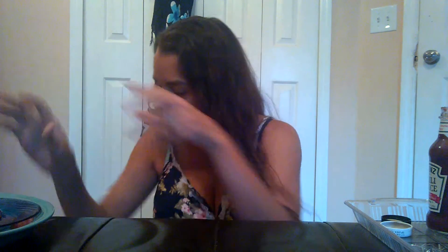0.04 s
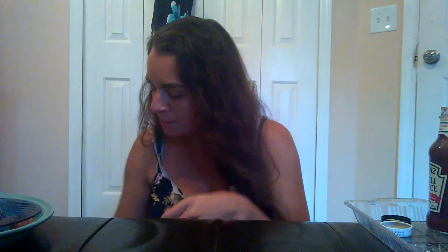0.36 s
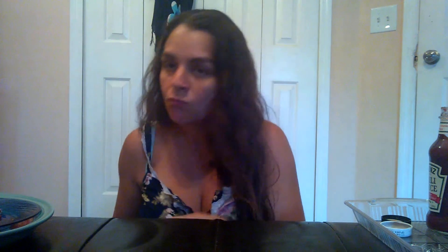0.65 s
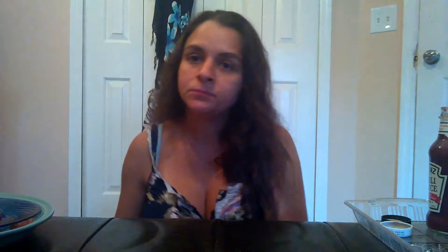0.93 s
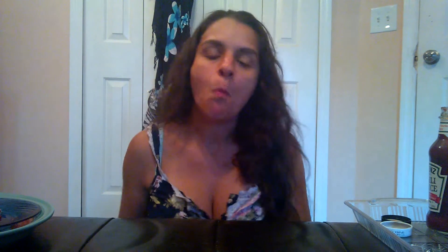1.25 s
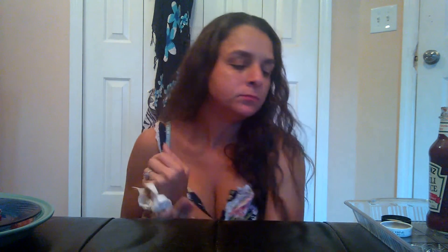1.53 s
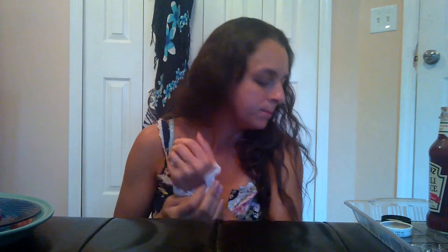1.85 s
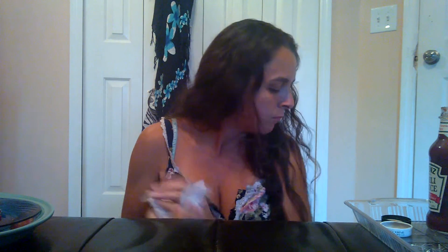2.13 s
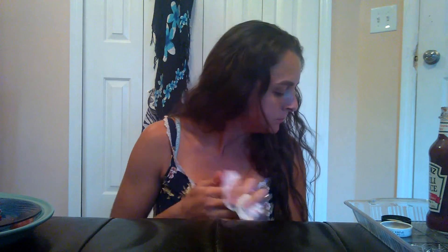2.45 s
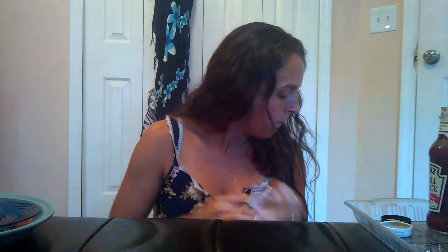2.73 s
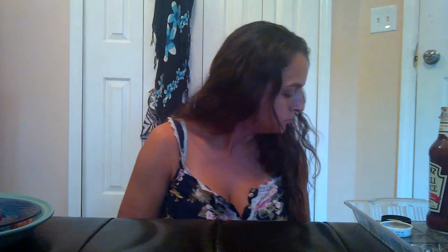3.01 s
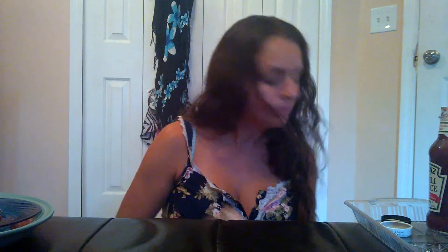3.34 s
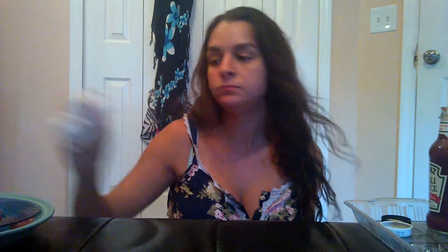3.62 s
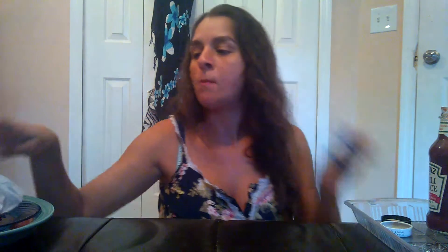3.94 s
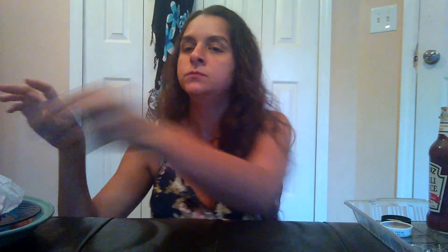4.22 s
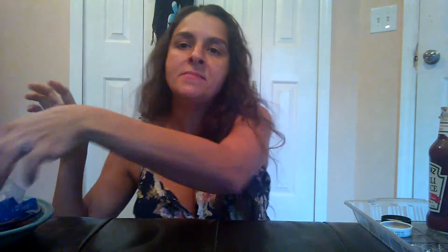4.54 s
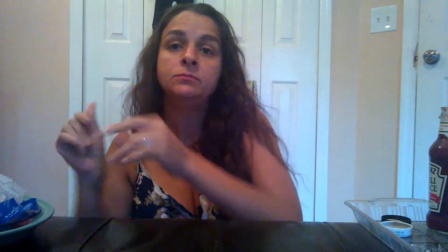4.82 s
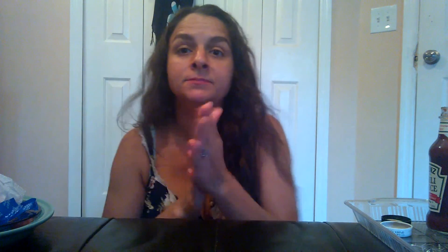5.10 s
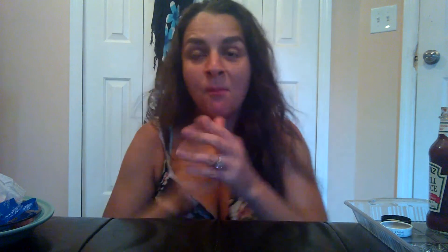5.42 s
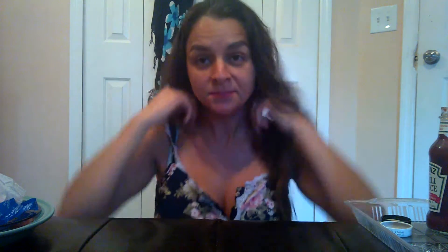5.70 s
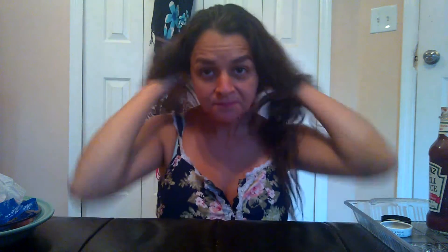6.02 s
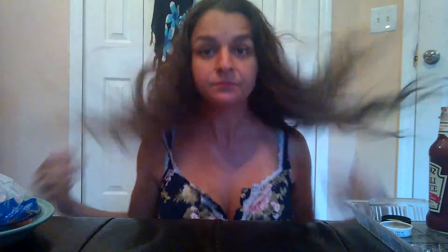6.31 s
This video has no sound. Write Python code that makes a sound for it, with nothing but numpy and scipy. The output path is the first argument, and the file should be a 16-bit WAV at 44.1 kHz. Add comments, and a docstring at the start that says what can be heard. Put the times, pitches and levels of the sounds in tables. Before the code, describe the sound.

Hands rub on a paper napkin, crumple it and drop it on crinkling wrappers, then brush against each other in a small, humming room.

```python
"""A soft paper napkin rustles as hands are wiped on it, at a table in a small room: fibres catch and slip.
Its creases buckle and snap as it is crumpled and put down on a plate of stiff wrappers.
Then bare palms brush together and hair is swept back. Arms thud on the table, an appliance hums.
A laptop's two microphone ports pick it up, and its stereo widening hollows the sound."""
import sys
import numpy as np
from scipy import signal
from scipy.fft import rfft, irfft
from scipy.io import wavfile

SR = 44100
rng = np.random.default_rng(int(sys.argv[2]) if len(sys.argv) > 2 else 0)


def store_pcm(level_fs):
    """Save levels as 16-bit WAV."""
    pcm = np.round(np.clip(level_fs, -1, 1) * 32767).astype(np.int16)
    wavfile.write(sys.argv[1], SR, np.atleast_2d(pcm).T)


N = 284886
TIME = np.arange(N) / SR
BINS = np.maximum(np.fft.rfftfreq(N, 1 / SR), 1)

# hands wipe on the napkin: fastest_s, length_s, hiss_db, rub_db
WIPES = [(.01, 0.065, -60, -61.5), (.125, 0.15, -57.5, -59), (.52, 0.069, -54, -48), (.7, 1, -64, -60.5),
         (1.085, 0.096, -53, -52.5), (1.21, 0.22, -51.5, -50.5), (1.46, 0.51, -58, -55),
         (1.57, 0.18, -50.5, -49.5), (1.73, 0.13, -45.5, -51), (1.87, 0.25, -50.5, -53),
         (1.98, 0.16, -45, -51), (2.2, 0.21, -42, -48.5), (2.38, 0.29, -45, -47.5),
         (2.55, 0.16, -45.5, -54.5), (2.78, 0.29, -51.5, -54), (2.9, 0.11, -44, -49.5),
         (3.0, 0.26, -51, -54), (3.19, 0.17, -49.5, -53.5), (3.35, 0.12, -58, -62)]
# the napkin rustles as it is lifted and put down: fastest_s, length_s, hiss_db, rub_db
SETTLES = [(3.51, 0.21, -27.5, -56), (3.75, 0.44, -44.5, -57), (3.9, 0.23, -34, -50.5),
           (4.11, 0.098, -37, -52.5), (4.22, 0.55, -47, -58.5), (4.42, 0.33, -35.5, -71),
           (4.8, 1, -47, -70)]
# tone colour of rubbed paper: frequency_hz, gain_db
NAPKIN_COLOUR = [(150, -10.5), (300, -12.5), (600, -18), (1200, -21), (2000, -18.5), (3500, -15),
                 (6000, -15.5), (8500, -12.5), (11500, -8.5), (14000, -14), (15400, -18.5)]
# the napkin buckles in bursts: start_s, rise_s, hold_s, fall_s, level_db
CRUMPLES = [(3.41, 0.001, 0.012, 0.004, -28.5), (3.416, 0.005, 0.028, 0.024, -21),
            (3.588, .001, 0.032, 0.021, -28), (3.696, .001, 0.026, 0.012, -36)]
# tone colour of buckling paper: frequency_hz, gain_db
CRUMPLE_COLOUR = [(700, -21), (2200, -40), (3700, -29), (6000, -16), (8500, -3), (11500, 6), (14000, -6),
                  (15400, 1)]
# the wrappers give way under the napkin: start_s, rise_s, hold_s, fall_s, level_db
WRAPPER_SHIFTS = [(4.053, .002, 0.031, .012, -43.5), (4.286, 0.0015, 0.028, .005, -33.5),
                  (4.313, 0.008, 0.022, 0.025, -28.5), (4.415, .003, .02, .02, -42),
                  (4.55, .003, .005, .008, -48), (4.578, 0.003, 0.03, 0.014, -45)]
# tone colour of the wrappers: frequency_hz, gain_db
WRAPPER_COLOUR = [(1500, -39), (3200, -21), (4200, -35), (5300, -3), (6700, -13), (9300, 5), (11700, 6),
                  (14000, -1), (15400, -17)]
# single creases snap, thin in the napkin, full in the wrappers: start_s, level_db, pitch_ratio, ring_db
SNAPS = [(3.4235, 0, 1.24, -14), (3.4248, -1, 1.27, -14), (3.4285, -6, 1.2, -12), (3.434, -1, 1.24, -14),
         (3.4395, -7, 1.2, -12), (3.4455, -7, 1.15, -12), (3.448, -4, 1.2, -12), (3.589, -12, 1.22, -10),
         (3.697, -19.5, 1.15, -8), (4.0525, -17, .92, -2), (4.0722, -26, 1, 0), (4.2856, -13, .85, 3),
         (4.2993, -15, .88, 2), (4.306, -16, 1, 0), (4.3125, 2, 1, -1.5), (4.322, -10, 1.15, -4),
         (4.327, -12, 1.05, -4), (4.3327, -7, 1.1, -3)]
# the brief ring of a taut crease: pitch_hz, t60_s, level_db
CREASE_MODES = [(5600, .007, -17), (7500, .003, -22), (9300, .005, -10), (11900, .003, -15),
                (14500, .002, -20)]

# the palms brush past each other: fastest_s, length_s, hiss_db, rub_db
BRUSHES = [(5.05, 0.071, -38, -54.5), (5.11, 0.13, -33, -68), (5.26, 0.2, -32.5, -61),
           (5.395, 0.12, -32.5, -59.5)]
# hair is swept back: fastest_s, length_s, hiss_db, rub_db
HAIR_SWEEPS = [(5.533, 0.21, -80, -62.5), (5.709, 0.12, -54, -55), (6.213, 1, -57, -65.5)]
# tone colour of skin and hair: frequency_hz, gain_db
SKIN_COLOUR = [(400, -7), (1100, -20.5), (2000, -13.5), (3500, -8.5), (6000, -7.5), (8500, -4),
               (11500, 0.5), (14000, -5.5), (15400, -5.5)]
# the palms meet with a light slap: start_s, rise_s, hold_s, fall_s, level_db
SLAPS = [(5.0255, .0005, .002, .0015, -29)]
# soft pats of the hands: start_s, fade_s, level_db, top_hz
PATS = [(0.252, .005, -46.5, 1700), (.492, .014, -49, 2000), (0.546, .009, -47, 1800),
        (.942, .008, -44.5, 2000), (1.045, .008, -51, 1500), (1.058, .011, -40.5, 1300),
        (3.512, .014, -46.5, 2200), (3.72, .004, -47, 1500), (3.892, .006, -43, 1600),
        (4.361, .007, -51, 1500), (4.396, .006, -37.5, 1700), (4.425, .012, -47, 2000),
        (5.024, .004, -33.5, 1800)]
# a light tick on something hard: start_s, level_db
TICKS = [(2.7425, -31.5)]
# the ring of that tick: pitch_hz, t60_s, level_db
TICK_MODES = [(1150, .014, -4), (1450, .014, -3), (1880, .3, -22), (2050, .012, -5), (3700, .008, 0),
              (6500, .005, -3)]

# arms bump the table: start_s, level_db, pitch_hz
BUMPS = [(0.326, -29.5, 93), (0.384, -13, 76), (0.404, -21, 95), (0.545, -19, 72), (0.703, -21.5, 80),
         (0.782, -21.5, 70), (0.82, -23, 80), (1.588, -29, 90), (1.62, -28, 67.6), (1.903, -26, 64),
         (2.539, -26, 94), (2.581, -23.5, 82), (2.872, -19.5, 91), (3.623, -14, 73), (3.653, -23, 50),
         (3.961, -23.5, 118), (4.978, -25.5, 89), (5.375, -17, 103), (5.415, -27, 66), (5.513, -29, 89),
         (5.546, -27, 85), (5.646, -25, 59), (5.716, -20, 76), (5.746, -23.5, 78), (5.862, -28, 55)]
# the table trembles as the arms move on it, and calms when they lift: time_s, level_db
TREMBLE_LEVELS = [(0, -42.5), (.4, -41), (1.2, -40.5), (2.8, -42.5), (3.7, -37.5), (4.501, -47.5),
                  (5.65, -39), (6.15, -49), (6.46, -47)]
# tone colour of room rumble and microphone hiss: frequency_hz, gain_db
ROOM_TONE_COLOUR = [(25, -20), (60, 8), (150, -9), (260, 3), (450, -12), (900, -23), (1500, -22),
                    (2300, -28), (3300, -27), (5500, -30), (9000, -26), (11600, -15), (13500, -22),
                    (15400, -29)]
# resonances of the humming appliance: pitch_hz, width_hz, level_db
HUM_BANDS = [(120.7, 7, -48.5), (212, 20, -55), (232, 29, -61), (322, 114, -62.5), (591, 48, -68.5),
             (834, 14, -75), (908, 106, -67)]

# how alike the two ports hear the sound: frequency_hz, likeness_ratio
PORT_LIKENESS = [(30, 0.9), (150, 1), (400, 0.88), (800, 0.63), (1800, 0.04)]
# the left port is the duller one: frequency_hz, gain_db
LEFT_PORT_EQ = [(4000, -.3), (7000, -2.5), (10000, -8.5), (15000, -8)]
# how much of each port the widening takes from the other: frequency_hz, share_ratio
WIDEN_SHARE = [(300, 0.7), (2500, 0.95), (4000, 0.49), (7500, 0.33), (11000, 0.59), (14000, 0.98)]

STROKE_RISE, STROKE_FALL = 0.45, 0.39  # shares of a stroke's length
BODY_HZ, BODY_SWING_DB, BODY_PER_S = (2800, 7500), 1.4, 28
LEAN_RIGHT_DB = [[-2], [0]]
ROOM_T60_S = 0.47


def rubbing(strokes, spectrum, hiss_db, rub_db, split_hz, per_s, spread_db, rough_db):
    """Fibres catch and slip by the thousand: bright hiss from the surface, dull rub from the hands."""
    hiss_gain, rub_gain = stroke_swells(strokes)
    colour = from_db(at_hz(spectrum))
    lows = 1 / np.sqrt(1 + (BINS / split_hz) ** 4)
    hiss = at_ports(grains(per_s, spread_db), colour * np.sqrt(1 - lows ** 2))
    # as the surface bends, the body of the rustle comes and goes
    body_gain = from_db(BODY_SWING_DB * flutter(BODY_PER_S))
    hiss = hiss + band(hiss, *BODY_HZ, order=1) * (body_gain - 1)
    rub = at_ports(grains(per_s, spread_db), colour * lows)
    roughness = from_db(rough_db * flutter(per_s=110))
    return (hiss * hiss_gain * from_db(hiss_db) + rub * rub_gain * from_db(rub_db)) * roughness


def stroke_swells(strokes):
    """Hiss and rub envelopes: each stroke swells to its fastest moment; overlaps add in power."""
    hiss_power, rub_power = 0, 0
    for fastest_s, length_s, hiss_db, rub_db in strokes:
        age = (TIME - fastest_s) / length_s
        width = np.where(age < 0, STROKE_RISE, STROKE_FALL)
        swell = np.exp(-np.minimum((age / width) ** 2, 20))
        hiss_power += (from_db(hiss_db) * swell) ** 2
        rub_power += (from_db(rub_db) * swell) ** 2
    return np.sqrt(hiss_power), np.sqrt(rub_power)


def creases(level_db=-5):
    """Here and there a small fold gives way as the napkin is wiped on or put down."""
    wipe_gain, _ = stroke_swells(WIPES)
    settle_gain, _ = stroke_swells(SETTLES)
    envelope = from_db(level_db) * (wipe_gain + 0.05 * settle_gain)
    ticks = folds(per_s=260, spread_db=2.8, low_hz=2200, high_hz=10000, cycles=4)
    return room(ticks * envelope * from_db(LEAN_RIGHT_DB), wet_db=-4)


def folds(per_s, spread_db, low_hz, high_hz, cycles, count=18):
    """Small folds give way at random, each ringing for some cycles at its own pitch; rms 1."""
    hits = grains(per_s, spread_db)[0]
    fold_of_hit = rng.integers(0, count, N)
    pitches = np.geomspace(low_hz, min(high_hz, .4 * SR), count)
    pitches *= np.exp(.03 * rng.standard_normal(count))
    out = 0
    for fold, hz in enumerate(pitches):
        ring = ringing(hits * (fold_of_hit == fold), [(hz, cycles / hz, 0)])
        out += np.sqrt(hz) * ring  # short high rings carry as much energy as long low ones
    return rms_one(out)


def crumpling(bursts, spectrum, per_s, spread_db, wet_db):
    """Each squeeze sets off an avalanche of tiny clicks, the sound of buckling creases."""
    avalanche = at_ports(grains(per_s, spread_db), from_db(at_hz(spectrum)))
    return room(squeeze(bursts) * avalanche, wet_db)


def squeeze(bursts):
    """Force envelope: each burst rises, holds and lets go."""
    force = 0
    for start_s, rise_s, hold_s, fall_s, db in bursts:
        age = TIME - start_s
        attack = np.clip(age / rise_s, 0, 1)
        release = np.exp(-np.maximum(age - rise_s - hold_s, 0) / fall_s)
        force += from_db(db) * attack * release
    return force


def crackle(paper_db=-13, plastic_db=-10):
    """Under a squeeze the larger facets ring out: briefly in paper, longer in the stiff wrappers."""
    paper = folds(per_s=900, spread_db=1, low_hz=3200, high_hz=7400, cycles=45)
    paper *= squeeze(CRUMPLES) * from_db(paper_db)
    plastic = folds(per_s=600, spread_db=1, low_hz=4800, high_hz=10500, cycles=130)
    plastic *= squeeze(WRAPPER_SHIFTS) * from_db(plastic_db)
    return room((paper + plastic) * from_db(LEAN_RIGHT_DB), wet_db=-6)


def snaps(crack_db=8, knock_db=-19):
    """A crease flips over with a sharp crack; the stiffer the sheet around it, the more that rings."""
    out = 0
    for start_s, db, pitch_ratio, ring_db in SNAPS:
        flip = clicks([(start_s, db)])
        modes = [(hz * pitch_ratio, t60_s, level_db) for hz, t60_s, level_db in CREASE_MODES]
        ring = band(ringing(flip, modes), 4800, 16000, order=4)
        knock = from_db(knock_db) * band(flip, 900, 3500)
        crack = from_db(crack_db) * band(flip, 7500 * pitch_ratio, 13500 * pitch_ratio, order=3)
        out += crack + from_db(ring_db) * (ring + knock)
    return room(out * from_db(LEAN_RIGHT_DB), wet_db=-4, table_db=10)


def slap():
    """For an instant the palms crack against each other before they slide."""
    return crumpling(SLAPS, SKIN_COLOUR, per_s=27000, spread_db=6, wet_db=-17)


def pats(low_hz=220, rise_s=0.001):
    """Soft pats of the hands: short, broad puffs, each with its own length and brightness."""
    out = 0
    for start_s, fade_s, db, top_hz in PATS:
        age = np.clip(TIME - start_s, 0, 20 * fade_s)
        envelope = from_db(db) * (1 - np.exp(-age / rise_s)) * np.exp(-age / fade_s)
        air = band(rng.standard_normal((2, N)), low_hz, top_hz, order=1)
        mid, side = band(air, 100, 3 * top_hz, order=1)
        out += envelope * rms_one(mid + .5 * side * [[1], [-1]])
    return room(out, wet_db=-4)


def tick():
    """Something small and hard is touched during the wiping, off to the right."""
    return room(ringing(clicks(TICKS), TICK_MODES) * from_db([[-6], [0]]), wet_db=-12.0)


def bumps(nudges_per_s=2.5, nudge_db=-35.5, nudge_hz=85, t60_s=0.045, rise_s=0.0016):
    """Arms bump the table and nudge it at random, shaking the microphones with low, damped thuds."""
    t = TIME[:SR // 2]
    envelope = from_db(-60 * t / t60_s) * (1 - np.exp(-t / rise_s))
    nudge_times = TIME[rng.random(N) < nudges_per_s / SR]
    nudges = [(start_s, nudge_db, nudge_hz * rng.uniform(.7, 1.4)) for start_s in nudge_times]
    shake = np.zeros(N + SR)
    for start_s, db, pitch_hz in BUMPS + nudges:
        thud = band(np.sin(2 * np.pi * pitch_hz * t) * envelope, 25, 260)
        start = round(start_s * SR)
        shake[start:start + len(t)] += from_db(db) * thud / np.abs(thud).max()
    return shake[:N] * [[-.05], [-1.0]]  # nearly all on the right


def tremble(band_hz=(18.5, 76), uneven_db=3.5):
    """Low, uneven rumble through the table, unrelated at the two microphones."""
    time_s, db = np.transpose(TREMBLE_LEVELS)
    gain = from_db(np.interp(TIME, time_s, db) + uneven_db * flutter(per_s=8.1))
    return gain * rms_one(band(rng.standard_normal((2, N)), *band_hz))


def room_tone(tone_db=-49, hum_trim_db=1):
    """A bed of room rumble and microphone hiss, with the narrow resonances of an appliance."""
    out = from_db(tone_db) * at_ports(rng.standard_normal((2, N)), from_db(at_hz(ROOM_TONE_COLOUR)))
    for hz, width_hz, db in HUM_BANDS:
        resonance = 1 / (1 + (2 * (BINS - hz) / width_hz) ** 2)
        out += from_db(db + hum_trim_db) * at_ports(rng.standard_normal((2, N)), resonance)
    return out


def sizzle(band_hz=(10500, 14000), per_s=25, fade_s=.004, level_db=-53, spread_db=3.5):
    """The top of the microphone hiss flickers in faint, uneven spits at a nearly steady rate."""
    turns = TIME * per_s + .15 * flutter(per_s=10)  # one turn for each spit
    strengths = from_db(level_db + spread_db * np.clip(rng.standard_normal(512), -2, 2))
    age = (turns % 1) / per_s
    spits = strengths[np.floor(turns).astype(int)] * np.exp(-age / fade_s)
    return spits * rms_one(band(rng.standard_normal((2, N)), *band_hz))


def room(x, wet_db, table_db=-40):
    """Add the walls' tail and a quick cluster of reflections off the table."""
    t = TIME[:SR]
    walls = from_db(-60 * t / ROOM_T60_S) * (1 - np.exp(-t / 0.012))
    table = from_db(table_db) * np.exp(-t / 0.0063)
    fade = walls + table
    response = rng.standard_normal((2, SR)) * fade / np.sqrt(np.sum(fade ** 2))
    return x + from_db(wet_db) * signal.fftconvolve(x, response, axes=1)[:, :N]


def at_ports(pair, gain):
    """Colour two unrelated signals as mid and side; long waves reach both ports alike. Rms 1."""
    mid, side = rfft(pair)
    alike = np.clip(at_hz(PORT_LIKENESS), 0, .99)
    ports = np.sqrt(1 + alike) * mid + np.sqrt(1 - alike) * side * [[1], [-1]]
    return rms_one(irfft(gain * ports, N))


def grains(per_s, spread_db):
    """Two streams of tiny random clicks of uneven size; rms 1."""
    sizes = from_db(spread_db * np.minimum(rng.exponential(1, (2, N)), 4))
    signs = rng.choice([-1, 1], (2, N))
    return rms_one(sizes * signs * (rng.random((2, N)) < per_s / SR))


def clicks(rows):
    """One impulse for each row of start_s, level_db."""
    out = np.zeros(N)
    for start_s, db in rows:
        out[round(start_s * SR)] += from_db(db)
    return out


def ringing(hits, modes):
    """Every impulse starts a decaying sine for each mode of pitch_hz, t60_s, level_db."""
    out = 0
    for hz, t60_s, db in modes:
        decay, angle = from_db(-60 / (t60_s * SR)), 2 * np.pi * hz / SR
        feedback = [1, -2 * decay * np.cos(angle), decay * decay]
        out += from_db(db) * signal.lfilter([0, np.sin(angle)], feedback, hits + 1e-18)
    return out


def flutter(per_s):
    """A random wobble that glides between per_s values a second; rms 1."""
    knots = rng.standard_normal(4096)
    return rms_one(np.interp(TIME * per_s, np.arange(len(knots)), knots))


def band(x, low_hz, high_hz, order=2):
    """Causal band-pass."""
    sections = signal.butter(order, [low_hz, min(high_hz, .45 * SR)], "band", fs=SR, output="sos")
    return signal.sosfilt(sections, x + 1e-18)


def at_hz(points):
    """Read a curve on a log-frequency axis."""
    hz, value = np.transpose(points)
    return np.interp(np.log(BINS), np.log(hz), value)


def from_db(db):
    """Decibels to gain."""
    return 10 ** (np.asarray(db) / 20)


def rms_one(x):
    """Scale to unit rms."""
    return x / np.sqrt(np.mean(x ** 2) + 1e-20)


def scene():
    """Napkin, wrappers, hands, table and room, mixed as they arrive at the two ports."""
    wipe = rubbing(WIPES, NAPKIN_COLOUR, hiss_db=9.5, rub_db=4.0, split_hz=1650,
                   per_s=10000, spread_db=-2.0, rough_db=1.0)
    settle = rubbing(SETTLES, NAPKIN_COLOUR, hiss_db=-9.5, rub_db=1, split_hz=980,
                     per_s=7000, spread_db=1.5, rough_db=0.34)
    palms = rubbing(BRUSHES + HAIR_SWEEPS, SKIN_COLOUR, hiss_db=2.5, rub_db=6.5, split_hz=1400,
                    per_s=6300, spread_db=0.5, rough_db=1.24)
    hands = room(wipe + settle + palms, wet_db=-9.5) + creases() + pats() + slap() + tick()
    napkin = crumpling(CRUMPLES, CRUMPLE_COLOUR, per_s=3000, spread_db=-2.0, wet_db=-6.5)
    wrappers = crumpling(WRAPPER_SHIFTS, WRAPPER_COLOUR, per_s=9800, spread_db=5.0, wet_db=-12.0)
    foreground = hands + napkin + wrappers + crackle() + snaps()
    return foreground + bumps() + tremble() + room_tone() + sizzle()


def record(dry):
    """The left port is duller; widening takes a delayed share of each from the other; the top is cut."""
    widen_lag_s, cutoff_hz = .000391, 15450
    left, right = rfft(dry)
    ports = np.array([left * from_db(at_hz(LEFT_PORT_EQ)), right])
    crossfeed = np.clip(at_hz(WIDEN_SHARE), 0, 1) * np.exp(-2j * np.pi * BINS * widen_lag_s)
    wide = irfft(ports - crossfeed * ports[::-1], N)
    return signal.sosfilt(signal.ellip(10, .3, 70, cutoff_hz, fs=SR, output="sos"), wide)


dry = scene()
out = record(dry)
store_pcm(out)
```